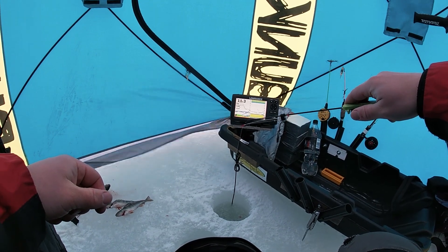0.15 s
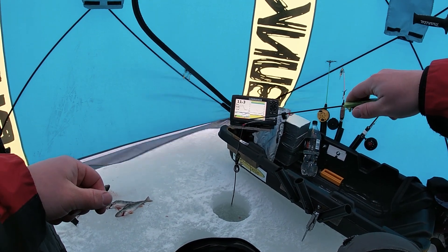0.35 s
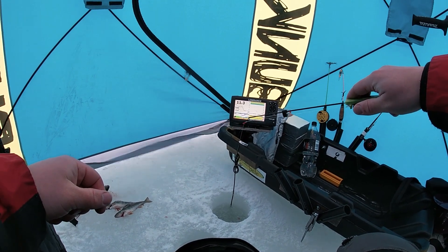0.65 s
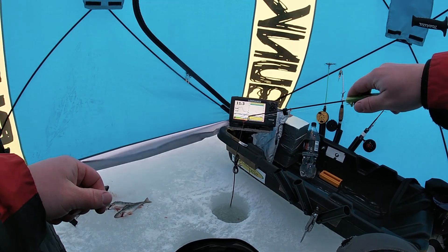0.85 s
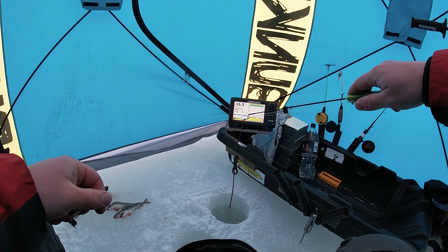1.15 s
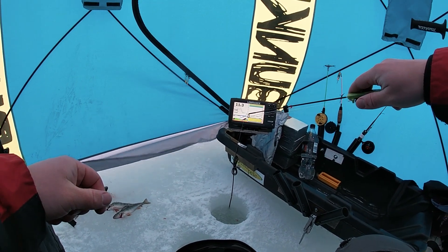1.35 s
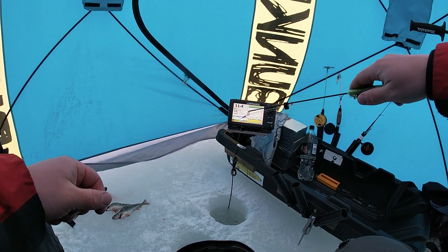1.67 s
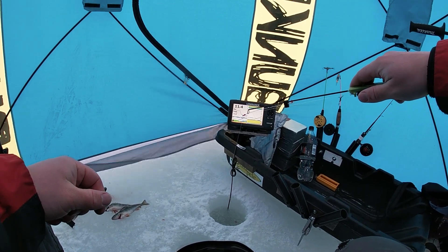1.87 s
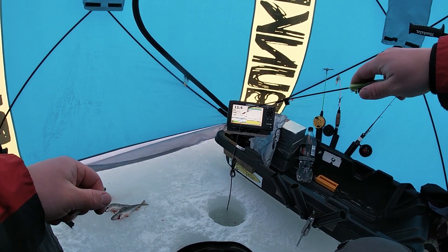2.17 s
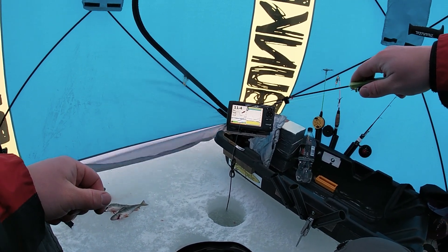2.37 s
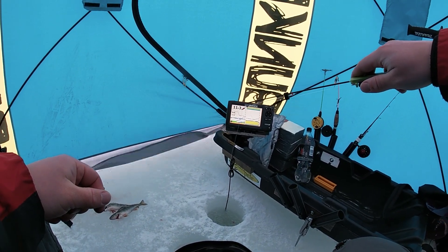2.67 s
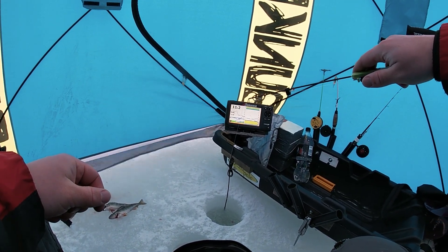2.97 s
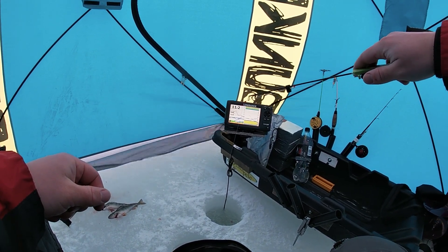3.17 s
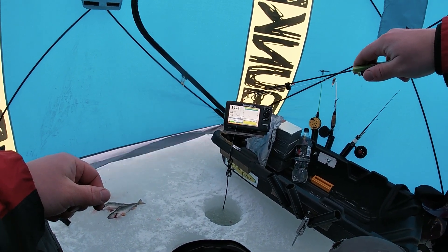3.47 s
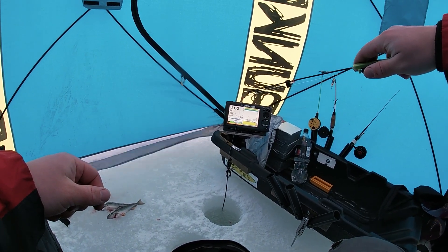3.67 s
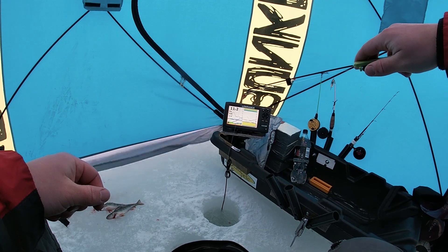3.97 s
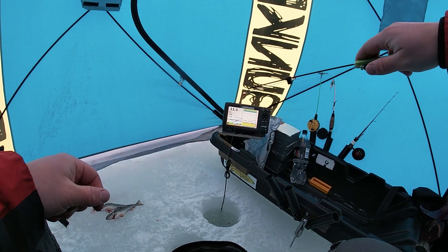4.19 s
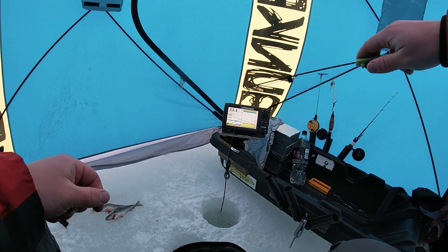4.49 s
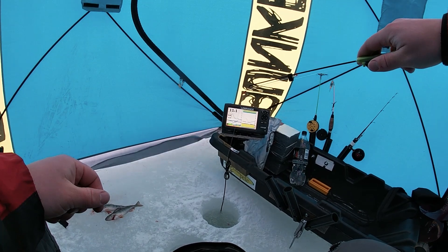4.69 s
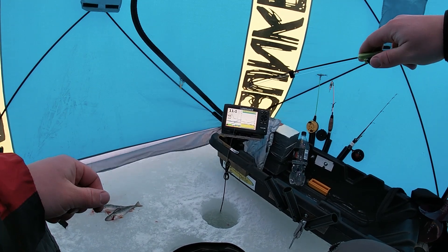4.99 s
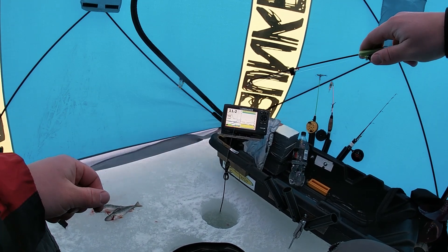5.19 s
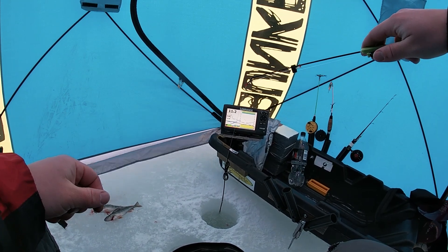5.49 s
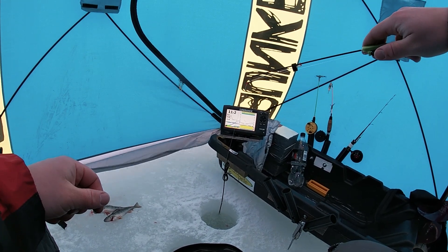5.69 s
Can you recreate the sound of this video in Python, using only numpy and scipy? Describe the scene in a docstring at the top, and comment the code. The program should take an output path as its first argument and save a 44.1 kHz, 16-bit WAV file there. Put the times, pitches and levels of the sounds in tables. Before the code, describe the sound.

A continuous stormy flutter inside a small fabric tent on ice, heard close from within. From 0 s the walls flap rapidly and irregularly, eight to ten beats a second; each beat is a short crinkling rustle with a papery crack and small pops from stiff creases. Beneath are deep wind buffeting on the microphone, a low drone from the shaking walls and thin hiss over cloth. Dull, quickly damped booms stand out around 0.2 and 0.75 s, with loose slaps near 1.5 s and short hollow rattles throughout. The rumble drops at about 2.3 s, swells again around 3 s, then weakens after 4 s. A strong flap lands near 4.1 s and a cluster of slaps around 4.5 s. From there the treble opens and the snapping sounds crisper and brighter, with prominent pops around 5.4-5.7 s. The flapping continues to the end, near 5.8 s.

```python
"""Inside a fabric shelter in a storm: from the start the walls flap eight to ten times a second.
Each flap is a burst of crinkling noise, with cracks and pops of the cloth. Loose cloth slaps and the walls boom
as damped oscillations, over wind made of filtered noise: a rumble on the microphone, a wall drone and a hiss.
Past four seconds the rumble weakens and the treble edge of the microphone opens up."""
import sys
import numpy as np
from scipy import signal
from scipy.fft import rfft, irfft, next_fast_len
from scipy.io import wavfile
from scipy.ndimage import uniform_filter1d, map_coordinates

SR = 44100
rng = np.random.default_rng(int(sys.argv[2]) if len(sys.argv) > 2 else 0)


def wav_out(sig):
    """Save sig, one row per channel (or a flat mono array), as 16-bit PCM at SR to the path in sys.argv[1]."""
    wavfile.write(sys.argv[1], SR, np.round(np.clip(np.atleast_2d(sig).T, -1, 1) * 32767).astype(np.int16))


N = 257892

# Wind. Each row: time in seconds, buffeting level in dB, wall drone level in dB, hiss level in dB.
WIND = [(0.0, -21, -28, -43), (0.06, -20, -22.5, -40), (0.28, -19.5, -24, -40), (0.41, -20.5, -24, -41),
        (0.9, -20, -26.5, -39.5), (1.3, -22, -26.5, -42), (1.78, -22, -29, -40.5), (2.08, -19, -27, -40),
        (2.29, -33, -26.5, -40), (2.39, -27, -26, -43), (2.75, -28, -28.5, -40.5),
        (3.08, -21.5, -27.5, -39.5), (3.65, -23.5, -31, -42), (3.97, -24, -26, -39),
        (4.17, -22.5, -30.5, -41.5), (4.42, -27, -31.5, -38), (4.56, -30, -30.5, -43.5),
        (4.8, -32.5, -32.5, -42), (5.11, -32.5, -35.5, -41.5), (5.26, -28, -33, -40.5),
        (5.47, -33.5, -34.5, -40.5), (5.85, -29.5, -35.5, -39.5)]
# Spectrum of the buffeting. Each row: frequency in Hz, relative density in dB per Hz.
BUFFET_SPECTRUM = [(9, -29), (15, 4), (30, 0), (42, 2), (60, -2), (85, -4.5), (120, -9.5), (170, -31)]
# Spectrum of the wall drone. Each row: frequency in Hz, relative density in dB per Hz.
DRONE_SPECTRUM = [(47, -48), (80, -19), (130, -5), (215, -1), (295, -5), (346, -10.5), (405, -10.5),
                  (462, -18), (550, -23), (650, -31.5), (840, -23.5), (1430, -120)]
# Spectrum of the hiss over the cloth. Each row: frequency in Hz, relative density in dB per Hz.
HISS_SPECTRUM = [(350, -34), (500, 3.5), (850, 4.5), (1300, 0), (3000, -7.5), (6000, -12), (9000, -21),
                 (10500, -28), (12000, -27), (14000, -31), (15000, -51)]
FLAP_DRONE_DB = 0.5  # swing of the drone with the beat of the flaps

# Booms of the walls. Each row: contact in seconds, level in dB before the gain of its kind, settled pitch in Hz.
BOOMS = [(0.051, -13, 182), (0.148, -11, 264), (0.229, -7, 170), (0.234, -11, 162), (0.409, -13.5, 235),
         (0.504, -15.5, 141), (0.75, -4.5, 214), (0.764, -4, 230), (0.789, -10, 203), (0.836, -18, 173),
         (1.107, -15, 217), (1.379, -13, 207), (1.479, -15.5, 264), (1.524, -14, 242), (1.549, -17, 223),
         (1.784, -8.5, 151.5), (1.992, -13.5, 183), (2.04, -16, 273), (2.151, -18, 164), (2.23, -17.5, 201),
         (2.261, -10, 206), (2.678, -8, 229), (2.909, -11.5, 225), (3.019, -13.5, 198), (3.219, -14.5, 238),
         (3.652, -22, 153), (3.849, -14, 194), (3.964, -9, 200), (4.01, -13, 262), (4.604, -16, 226),
         (4.826, -17.5, 238), (4.946, -22, 292), (5.252, -17.5, 290), (5.328, -22, 286), (5.44, -21, 257),
         (5.452, -22.5, 143), (5.558, -20.5, 263)]
# Slaps of loose cloth. Each row: contact in seconds, level in dB before the gain of its kind, settled pitch in Hz.
SLAPS = [(0.012, -15, 600), (0.051, -10, 515), (0.124, -18, 500), (0.15, -16.5, 480), (0.203, -23, 650),
         (0.354, -22, 412), (0.423, -17, 385), (0.524, -17, 415), (0.643, -16.5, 375), (0.987, -19, 404),
         (1.069, -17, 356), (1.231, -30, 352), (1.379, -17.5, 380), (1.506, -8.5, 417), (1.674, -20, 353),
         (1.851, -18, 600), (2.058, -14, 600), (2.262, -21, 400), (2.65, -15.5, 431), (2.663, -20, 360),
         (2.839, -12.5, 408), (3.146, -20, 380), (3.369, -19, 443), (3.721, -21, 361), (3.832, -23, 490),
         (3.848, -13, 477), (3.875, -20, 520), (4.072, -19, 600), (4.267, -13.5, 536), (4.285, -13, 560),
         (4.471, -19, 520), (4.508, -8.5, 514), (4.604, -15, 700), (4.622, -17, 600), (4.635, -12, 450),
         (4.643, -16, 500), (5.124, -22, 406), (5.795, -19, 342)]
# Rattles near the pitch of the enclosed air.
# Each row: contact in seconds, level in dB before the gain of its kind, settled pitch in Hz.
RATTLES = [(0.243, -22, 900), (0.322, -20, 990), (0.433, -24, 700), (0.53, -15.5, 844), (0.605, -21, 750),
           (0.629, -11.5, 850), (0.664, -20, 861), (0.776, -17, 875), (0.799, -10, 900), (1.081, -24, 958),
           (1.129, -26, 778), (1.282, -23, 711), (1.363, -21, 711), (1.468, -15, 775), (1.553, -22, 689),
           (1.787, -16, 960), (1.856, -17, 800), (1.889, -19, 860), (2.094, -20, 870), (2.299, -17, 850),
           (2.399, -10, 810), (2.614, -20, 970), (2.628, -21, 845), (2.687, -17, 854), (2.779, -16, 855),
           (2.947, -15.5, 780), (3.058, -14, 1020), (3.545, -19, 824), (3.769, -18, 770), (4.074, -12, 900),
           (4.519, -18, 960), (4.742, -15, 1030), (4.839, -19, 870), (4.89, -19.5, 796), (4.953, -19, 760),
           (5.144, -17, 855), (5.488, -17, 826), (5.61, -23, 920), (5.728, -18.5, 820)]
# Pops of stiff creases inside the flaps.
# Each row: contact in seconds, level in dB before the gain of its kind, settled pitch in Hz.
POPS = [(0.02, -34, 1550), (0.122, -44, 12000), (0.193, -33, 2756), (0.199, -32, 1330), (0.41, -31, 5700),
        (0.415, -23.5, 2200), (0.433, -30, 5600), (0.525, -32, 1710), (0.604, -27, 1880), (0.77, -28, 1380),
        (0.795, -32, 2410), (0.865, -32, 2240), (1.66, -28, 1880), (1.769, -29, 3080), (1.853, -25, 1540),
        (1.979, -28, 2756), (2.183, -35, 2620), (2.389, -26, 2583), (2.479, -32, 2928), (2.6, -44, 8200),
        (2.62, -45, 8200), (2.691, -25, 1894), (2.915, -31, 2420), (3.032, -30, 1690), (3.17, -35, 2380),
        (3.524, -28, 2550), (3.619, -33, 2067), (4.07, -32, 3260), (4.36, -34, 2756), (4.608, -32, 1920),
        (4.719, -25, 2760), (4.856, -24.5, 2600), (4.957, -24, 1840), (5.105, -37, 9600),
        (5.124, -28, 2583), (5.131, -34, 1390), (5.354, -22, 2650), (5.47, -20, 2928), (5.489, -34, 2067),
        (5.586, -24, 5800), (5.613, -33, 1230), (5.694, -21, 2720), (5.819, -30, 1894), (5.837, -31, 2411)]
BOOM_CYCLES, SLAP_CYCLES, RATTLE_CYCLES, POP_CYCLES = 2.84, 1.51, 8, 12  # cycles to fall by 26 dB
SLACK_CYCLES = 0.11  # cycles over which the raised pitch settles
RAGGED_DB = 1.3  # how unevenly a struck skin rings

# Cracks as the cloth snaps taut.
# Each row: start in seconds, level in dB, treble in dB over that level, first tick in dB over that level.
CRACKS = [(0.1111, -25.5, -24, -13), (0.1874, -24.5, -29, -19), (0.3112, -26.5, -36, -16),
          (0.3614, -35, -22, -13), (0.4004, -34, -25, -11), (0.409, -24, -30, -12),
          (0.5122, -26.5, -32, -15), (0.5926, -29, -28, -11), (0.6779, -25, -25, -14),
          (0.7572, -27, -28, -13), (0.8659, -24.5, -32, -14.5), (0.9487, -26.5, -25, -13),
          (1.0324, -35, -26, -13), (1.1423, -28, -30, -15), (1.2256, -34.5, -26, -10),
          (1.2516, -31, -31, -14), (1.3214, -29, -31, -11), (1.3443, -26, -31, -13),
          (1.4476, -31.5, -31, -12.5), (1.506, -32, -31, -13), (1.5993, -34, -27, -12),
          (1.6686, -29, -30, -14), (1.7644, -24, -32, -15), (1.8502, -26.5, -30, -13),
          (1.9584, -30.5, -26, -13), (2.0403, -31, -27, -11), (2.0527, -27.5, -29, -12),
          (2.1796, -26, -38, -20), (2.263, -25.5, -32, -15), (2.3531, -29, -29, -10),
          (2.391, -23, -41, -14), (2.4593, -28, -32, -15), (2.4803, -27, -40, -16), (2.5626, -39, -26, -11),
          (2.575, -35, -28, -13), (2.59, -29, -27, -16), (2.6668, -32.5, -29, -12),
          (2.7786, -29.5, -27, -6), (2.9054, -26, -33, -13), (3.017, -25.5, -36, -9),
          (3.1308, -28, -28, -11), (3.2256, -31, -35, -12), (3.2434, -29, -34, -18),
          (3.2574, -29, -27, -11), (3.271, -21.5, -40, -20), (3.4634, -38, -36, -18),
          (3.4974, -33, -36, -14), (3.5844, -34.5, -32, -11), (3.7075, -28.5, -34, -12),
          (3.7289, -27, -39, -17), (3.8327, -27, -35, -11), (3.9414, -31, -30, -13),
          (4.0706, -25, -40, -21), (4.2063, -31.5, -34, -16), (4.5082, -32, -39, -19),
          (4.589, -25.5, -32, -20), (4.6069, -24, -33, -19), (4.7017, -26, -34, -16),
          (4.7205, -26.5, -37, -13), (4.8274, -30, -34, -15), (4.8504, -26, -35, -13),
          (4.9536, -26, -26, -17), (5.0784, -31, -28, -11), (5.1003, -27, -26, -16),
          (5.184, -33, -25, -8.5), (5.2121, -25, -29, -13), (5.3268, -23.5, -28, -14.5),
          (5.4515, -27, -31, -13), (5.472, -21, -37, -18), (5.5625, -27.5, -26, -8), (5.663, -29, -25, -12),
          (5.6955, -23, -31, -18), (5.7962, -22.5, -31, -13.5)]
# Spectrum of the bright band of a crack and of single folds.
# Each row: frequency in Hz, relative density in dB per Hz.
CRACK_SPECTRUM = [(1500, -25), (2600, 6), (4100, 0), (6100, -2), (8100, -8.5), (9500, -18)]
# Spectrum of the first tick of a crack. Each row: frequency in Hz, relative density in dB per Hz.
FRONT_SPECTRUM = [(3000, -9), (4200, -0.5), (5500, 0), (7200, -3), (9000, -10.5), (13000, -22)]
CRACK_RISE_S, CRACK_T60_S, CRACK_DB = 0.0047, 0.34, -15.5  # the bright band follows its tick
TREBLE_T60_S, CRACK_TREBLE_DB = 0.61, 3  # the treble lingers
TICK_T60_S, TICK_DB, TREBLE_TICK_DB = 0.0088, -9, 0  # sharp start of the bright band and of the treble
FRONT_T60_S, FRONT_DB = 0.041, 1.5  # the first tick

# Flaps of the walls. Each row: start in seconds, rustle level in dB, rise in seconds, hold in seconds,
# then body, crispness and sizzle, each in dB over the rustle.
FLAPS = [(0.009, -41.5, 0.031, 0.013, 13.5, -9, -22.0), (0.106, -36.5, 0.015, 0.046, 4, -9, -18),
         (0.174, -37.5, 0.002, 0.032, 5.5, -13, -15), (0.228, -39, 0.0095, 0.017, 7, -17, -20),
         (0.27, -39.5, 0.031, 0.045, 2.5, -11, -14), (0.394, -34.5, 0.021, 0.001, 1.5, -8, -20.5),
         (0.485, -36, 0.028, 0.02, 5, -9.5, -18.5), (0.577, -38.5, 0.021, 0.026, 1, -14, -16),
         (0.661, -35.5, 0.036, 0.03, -5, -10, -17.5), (0.747, -36, 0.039, 0.023, 1, -11.5, -17),
         (0.846, -37, 0.019, 0.003, -6, -7, -10), (0.937, -37.5, 0.016, 0.004, 2, -10.5, -12.0),
         (1.029, -39, 0.047, 0.008, 2.5, -13, -11), (1.126, -41.5, 0.0063, 0.053, 5, -13, -13.0),
         (1.233, -38.5, 0.026, 0.006, 4.5, -12.0, -15), (1.34, -38, 0.0035, 0.025, -1, -12, -17.5),
         (1.431, -36.5, 0.026, 0.007, 1, -16, -12.5), (1.51, -40.5, 0.011, 0.06, 4, -9, -13.0),
         (1.6, -49, 0.0099, 0.041, -5, -12, -5), (1.651, -38.5, 0.0048, 0.03, -1, -14.0, -14.5),
         (1.749, -34.5, 0.022, 0.001, 4, -12, -10), (1.819, -37.5, 0.049, 0.001, 4.5, -5, -11),
         (1.925, -41.5, 0.035, 0.041, 3, -7, -10), (2.043, -38, 0.012, 0.042, 3.5, -14, -20),
         (2.146, -34.5, 0.041, 0.007, -2.5, -21, -20), (2.257, -35.5, 0.017, 0.035, 2, -11, -18.0),
         (2.343, -34, 0.05, 0.0038, 1, -11, -18.5), (2.442, -38.5, 0.037, 0.017, 5.5, -11, -18.5),
         (2.553, -40.5, 0.03, 0.059, 5, -18, -18), (2.669, -35.5, 0.025, 0.026, 4, -15.0, -19),
         (2.764, -36.5, 0.044, 0.027, 3, -6.5, -17.5), (2.893, -37.0, 0.03, 0.031, -5, -9, -17.5),
         (3.002, -36, 0.026, 0.044, -1.5, -11, -25), (3.109, -37.5, 0.037, 0.028, 1, -13, -16),
         (3.237, -33, 0.029, 0.003, -2, -11, -17.5), (3.33, -37, 0.042, 0.042, 3, -13, -19.5),
         (3.47, -34.5, 0.056, 0.0088, 0.5, -21, -34), (3.577, -39, 0.041, 0.045, 0.5, -18, -34.0),
         (3.696, -33.5, 0.051, 0.018, 0, -21, -28), (3.82, -37, 0.011, 0.061, 2.5, -17, -32),
         (3.934, -33.5, 0.058, 0.001, 2, -10.5, -17), (4.068, -30.5, 0.0026, 0.001, 2, -25, -30),
         (4.176, -42, 0.032, 0.03, -2, -11, -32.5), (4.263, -46, 0.009, 0.053, 1, -11, -35.0),
         (4.327, -38, 0.037, 0.001, -8, -23, -37.5), (4.451, -42.5, 0.026, 0.044, -9, -18, -40.0),
         (4.58, -33.5, 0.037, 0.0027, 4, -11.5, -18.5), (4.674, -38.5, 0.025, 0.06, 0.5, -11.5, -23.5),
         (4.824, -39, 0.0092, 0.047, -5, -8, -29.0), (4.949, -34, 0.005, 0.042, -3.5, -9, -19),
         (5.064, -37, 0.054, 0.014, -3, -8, -24.0), (5.195, -33, 0.04, 0.0045, -1.5, -6, -12),
         (5.312, -36.5, 0.034, 0.035, 0, -3, -10), (5.439, -36.5, 0.037, 0.012, -2, -4.5, -11),
         (5.57, -40, 0.013, 0.059, -0.5, -4.5, -10), (5.683, -33.5, 0.012, 0.041, -6, -7, -14),
         (5.787, -33, 0.034, 0.053, -5, -7, -13)]
# Resonances of cloth and enclosed air. Each row: centre in Hz, width in Hz, gain in dB.
BODY_MODES = [(546, 103, -1), (740, 82, 2.5), (862, 37.5, 5.5), (1017, 48, 3.5), (1225, 430, -6.5)]
# Spectrum of the rustle. Each row: frequency in Hz, relative density in dB per Hz.
RUSTLE_SPECTRUM = [(900, -6), (1300, -1.5), (2000, 1.5), (2800, 0), (4000, -7.5), (5600, -15.5),
                   (7500, -25), (9500, -34)]
# Spectrum of the crispness. Each row: frequency in Hz, relative density in dB per Hz.
CRISP_SPECTRUM = [(2800, -3), (3800, -0.5), (5500, -1.5), (7200, -5), (9000, -25)]
# Spectrum of the sizzle and of the treble of a crack. Each row: frequency in Hz, relative density in dB per Hz.
SIZZLE_SPECTRUM = [(5500, 1), (7000, 11), (8500, 7.5), (10500, -3.5), (12200, -1.5), (14100, -11),
                   (15000, -41)]
RELAX_S, RELAX_LOST = 0.24, 23  # t60 of a flap without hold; it shrinks by this exponent per second of hold
BODY_TOP_HZ = 5000  # the noise of the body fades above this
CRACKLE_DB = -8.5  # single folds over the crispness

# Treble of the microphone. Each row: time in seconds, edge in Hz, drop above the edge in dB,
# level above the knee in dB, level of the top band in dB.
EDGE = [(0, 5810, 11.5, 3, 1.5), (3.4, 5770, 13.5, 2.5, 0.8), (3.6, 5630, 14, 4, 0.3),
        (4.15, 5800, 14, 3.5, 0.3), (4.3, 6000, 3, -10, -1.5), (4.45, 7500, 6, -8, -2.5),
        (4.6, 7240, 6.5, -3.5, -4), (5.85, 7540, 7, -0.5, -5)]
KNEE_HZ, FALL_DB_PER_OCTAVE = 3900, 60
LIP_DB, LIP_OCTAVES = 0.5, 0.1  # a small peak just under the treble edge
AIR_HZ, AIR_OCTAVES = 10200, 0.15  # the top band starts here and sets in over this span
ROLL_HZ, TOP_HZ = 14500, 15025  # roll-off and band limit


def amp(db):
    """Decibels are twenty times the logarithm of an amplitude ratio."""
    return 10 ** (np.asarray(db) / 20)


def unit(x):
    """Division by the root mean square gives a signal of rms 1."""
    return x / np.sqrt(np.mean(x ** 2) + 1e-20)


def wobble(rate):
    """Interpolation through random knots, rate of them a second, gives a smooth random curve."""
    knots = rng.standard_normal(int(N * rate / SR) + 4)
    return map_coordinates(knots, [np.arange(N) * rate / SR])


def curves(rows, s):
    """Linear interpolation reads each column after the time at times s."""
    times, *columns = np.transpose(rows)
    return [np.interp(s, times, column) for column in columns]


def filtered(x, response):
    """A linear filter multiplies the spectrum by a response of frequency."""
    size = next_fast_len(N + SR // 2)
    return irfft(rfft(x, size) * response(np.fft.rfftfreq(size, 1 / SR)), size)[:N]


def colour(points):
    """A spectral envelope is interpolated in dB on a log frequency axis, all but silent outside its points."""
    f, db = np.transpose(points)
    return lambda hz: amp(np.interp(np.log(hz + 1), np.log(f), db, -120, -120))


def modes(rows):
    """Superposition of damped resonances of alternating sign."""
    def response(f):
        total = 0
        for k, (centre, width, db) in enumerate(rows):
            resonance = 1j * f * width / (centre ** 2 - f ** 2 + 1j * f * width)
            total = total + (-1) ** k * amp(db) * resonance
        return total
    return response


def patchy(response, patchy_db):
    """Filtered noise of rms 1, modulated by small patches of random gain in time and frequency."""
    noise = signal.stft(rng.standard_normal(N), nperseg=256)[2]
    field = uniform_filter1d(rng.standard_normal(noise.shape), size=4, axis=0)
    field = uniform_filter1d(field, size=8, axis=1)
    uneven = signal.istft(noise * amp(patchy_db * unit(field)), nperseg=256)[1][:N]
    return unit(filtered(uneven, response))


def wind():
    """Turbulence buffets the microphone, shakes the walls into a drone swelling with the flaps, and hisses on cloth."""
    buffet_db, drone_db, hiss_db = curves(WIND, np.arange(N) / SR)
    low = amp(buffet_db) * patchy(colour(BUFFET_SPECTRUM), patchy_db=0.16)
    beat_db = FLAP_DRONE_DB * (unit(strokes()[0]) - 1)
    walls = amp(drone_db + beat_db) * unit(amp(1.1 * wobble(25)))
    walls = walls * patchy(colour(DRONE_SPECTRUM), patchy_db=0.0)
    hiss = amp(hiss_db + 1.8 * wobble(30)) * patchy(colour(HISS_SPECTRUM), patchy_db=2.5)
    return low + walls + hiss


def knocks(rows, cycles, attack, gain_db, lead, slack):
    """Heavily damped oscillation: a struck skin swells over attack cycles, then decays exponentially."""
    out = np.zeros(N + SR)
    for s, db, hz in rows:
        u = np.arange(SR // 10) * hz / SR  # time in cycles
        envelope = amp(db + gain_db - 26 * u / cycles) * (1 - np.exp(-u / attack))
        # the pitch starts high by a share slack / SLACK_CYCLES and settles as the skin loosens
        phase = u + slack * (1 - np.exp(-u / SLACK_CYCLES))
        start = round((s + lead) * SR)  # the air moves a short lead, in seconds, after contact
        out[start:][:len(u)] -= envelope * np.sin(2 * np.pi * phase)
    return out[:N] * amp(RAGGED_DB * wobble(220))


def struck_skins():
    """Damped membranes: the walls boom, loose cloth slaps, and rattles and stiff creases ring for more cycles."""
    skins = knocks(BOOMS, BOOM_CYCLES, attack=0.35, gain_db=4.0, lead=0.00304, slack=0.034)
    skins += knocks(SLAPS, SLAP_CYCLES, attack=0.19, gain_db=5.0, lead=0.00211, slack=0.088)
    skins += knocks(RATTLES, RATTLE_CYCLES, attack=1.0, gain_db=-1.0, lead=0.00155, slack=0.017)
    return skins + knocks(POPS, POP_CYCLES, attack=2.9, gain_db=7, lead=0.00121, slack=0.01)


def cracks():
    """Impulsive excitation: bright noise starts at once with a crisp tick and dies away; overlapping powers add."""
    power, t = np.zeros((3, N + SR)), np.arange(SR // 3) / SR

    def decay(t60):
        return amp(-60 * t / t60) ** 2

    tick = decay(TICK_T60_S)
    bright_shape = (1 - np.exp(-t / CRACK_RISE_S)) * decay(CRACK_T60_S) + amp(TICK_DB) ** 2 * tick
    treble_shape = decay(TREBLE_T60_S) + amp(TREBLE_TICK_DB) ** 2 * tick
    shapes = np.array([bright_shape, treble_shape, decay(FRONT_T60_S)])
    for s, db, treble_db, front_db in CRACKS:
        band_db = db + np.array([CRACK_DB, treble_db + CRACK_TREBLE_DB, front_db + FRONT_DB])
        power[:, round(s * SR):][:, :len(t)] += amp(band_db)[:, None] ** 2 * shapes
    bright, treble, front = np.sqrt(power[:, :N])
    burst = bright * patchy(colour(CRACK_SPECTRUM), patchy_db=2.0)
    burst += front * patchy(colour(FRONT_SPECTRUM), patchy_db=0.9)
    return burst + treble * patchy(colour(SIZZLE_SPECTRUM), patchy_db=1.1)


def creases(rate, life, spread_db):
    """Shot noise: creases start at once at random and fade, giving a jagged gain of rms 1 over a steady part."""
    starts = (rng.random(N) < rate / SR) * amp(spread_db * rng.standard_normal(N))
    fade = np.exp(-np.arange(SR // 20) / SR / life)
    return unit(3.7 + signal.fftconvolve(starts, fade)[:N])


def crackle(rate, spread_db):
    """Sparse random impulses: clicks of single folds, each of its own size."""
    clicks = (rng.random(N) < rate / SR) * amp(spread_db * rng.standard_normal(N))
    return unit(filtered(clicks * rng.standard_normal(N), colour(CRACK_SPECTRUM)))


def strokes():
    """Tension cycle: each flap tightens the cloth, holds while it travels, then relaxes, faster after a longer hold."""
    power, t = np.zeros((4, N + SR)), np.arange(SR // 2) / SR
    for s, db, rise, hold, *over_db in FLAPS:
        t60 = RELAX_S * np.exp(-RELAX_LOST * hold)
        tighten = np.clip(t / max(rise, .001), 0, 1)
        relax = amp(-60 * np.clip(t - rise - hold, 0, None) / t60)
        levels = amp(db + np.array([0, *over_db]))[:, None]
        power[:, round(s * SR):][:, :len(t)] += (levels * tighten * relax) ** 2
    return np.sqrt(power[:, :N])


def flaps():
    """Friction noise and resonance: moving cloth rustles, sounds its body, crisps and sizzles, blended anew each flap."""
    rustle, body, crisp, sizzle = strokes()

    def body_response(f):
        return modes(BODY_MODES)(f) / (1 + (f / BODY_TOP_HZ) ** 2)

    cloth = rustle * patchy(colour(RUSTLE_SPECTRUM), patchy_db=2.0)
    cloth += crisp * patchy(colour(CRISP_SPECTRUM), patchy_db=3.5)
    cloth += body * amp(0.79 * wobble(60)) * patchy(body_response, patchy_db=2.0)
    cloth += amp(CRACKLE_DB) * crisp * crackle(rate=370, spread_db=5)
    return cloth + sizzle * amp(0.89 * wobble(7.9)) * patchy(colour(SIZZLE_SPECTRUM), patchy_db=3.5)


def scene():
    """Superposition of wind, skins and cloth at one microphone."""
    # the same creases roughen every band of the cloth at once
    crinkle = creases(rate=300, life=0.0017, spread_db=3.0) * unit(amp(0.94 * wobble(700)))
    return (wind() + struck_skins() + crinkle * (cracks() + flaps()))[None]


def record(dry):
    """Time-varying filtering: treble shifts in level and falls from a moving edge to a shelf, under a band limit."""
    hz, t, z = signal.stft(dry[0], SR, nperseg=512)
    edge_hz, drop_db, treble_db, air_db = curves(EDGE, t)
    hz = hz[:, None] + 1
    above_edge = np.log2(hz / edge_hz)  # octaves
    gain_db = treble_db * np.clip(np.log2(hz / KNEE_HZ), 0, 1)
    gain_db -= np.clip(FALL_DB_PER_OCTAVE * above_edge, 0, drop_db)
    gain_db += LIP_DB * np.exp(-(above_edge / LIP_OCTAVES + .5) ** 2)
    gain_db += air_db * np.clip(np.log2(hz / AIR_HZ) / AIR_OCTAVES, 0, 1)
    dull = signal.istft(z * amp(gain_db), SR, nperseg=512)[1][:N]
    return filtered(dull, lambda f: (f < TOP_HZ) / (1 + (f / ROLL_HZ) ** 20))[None]


dry = scene()
out = record(dry)
wav_out(out)
```